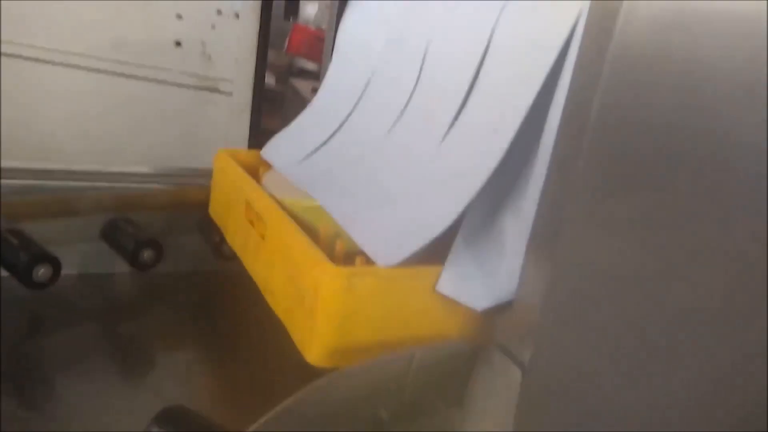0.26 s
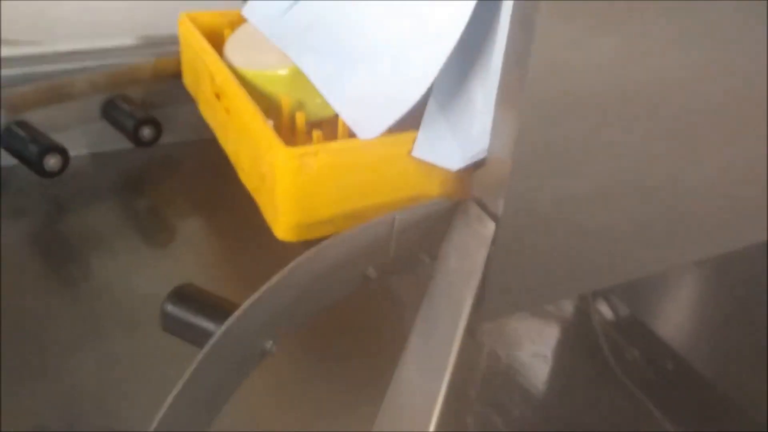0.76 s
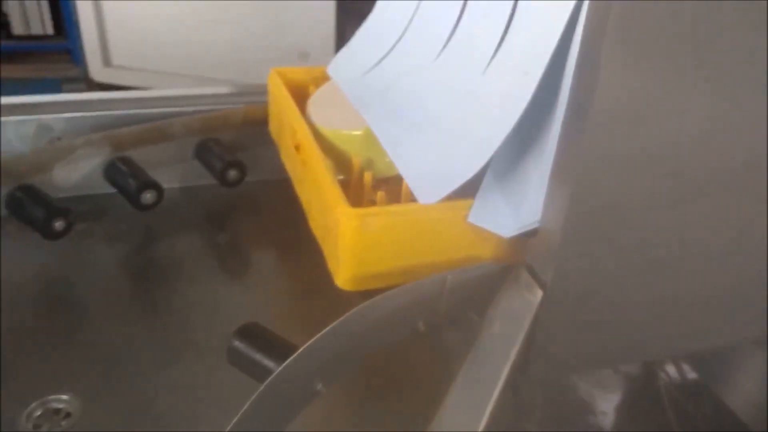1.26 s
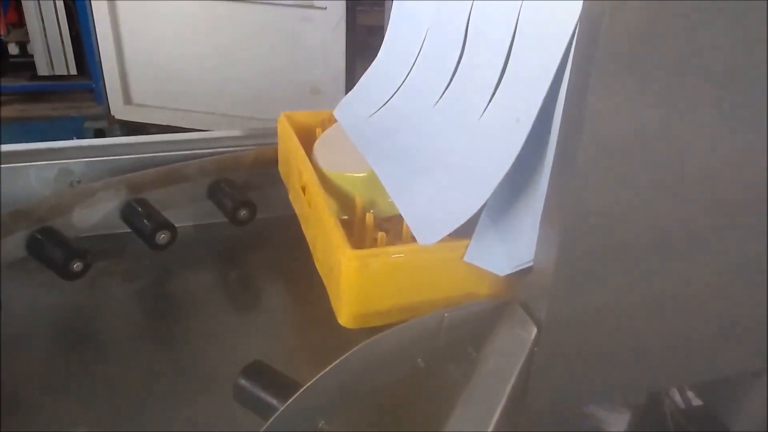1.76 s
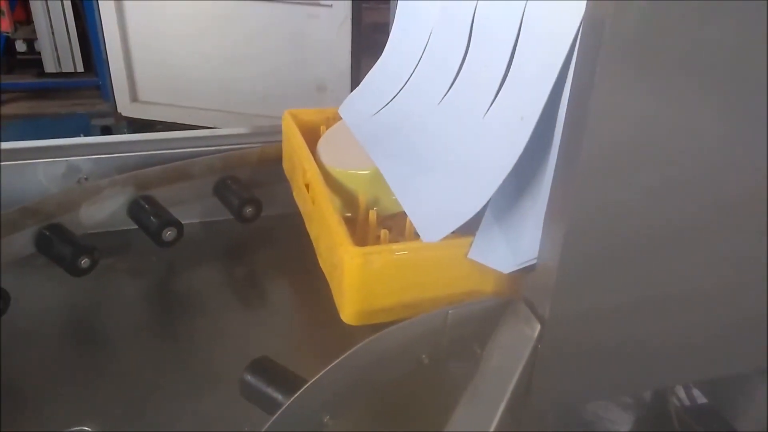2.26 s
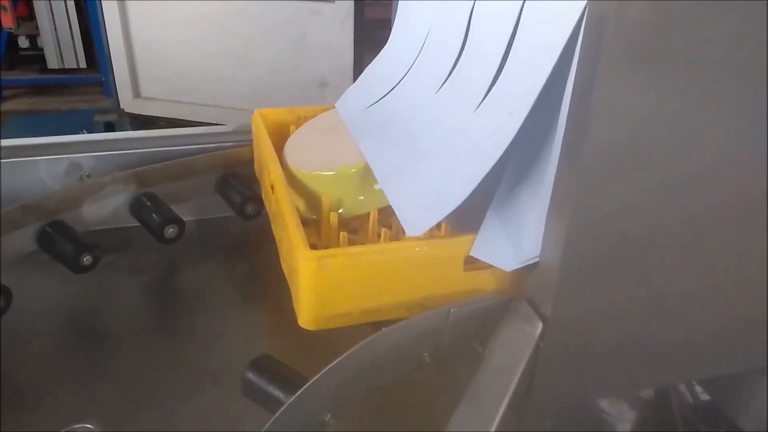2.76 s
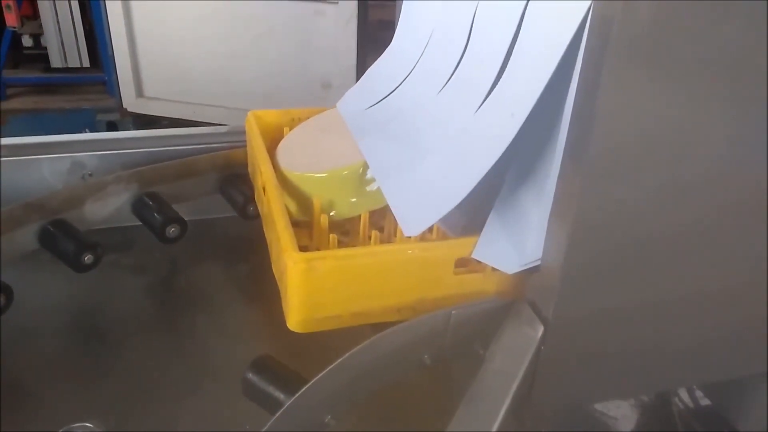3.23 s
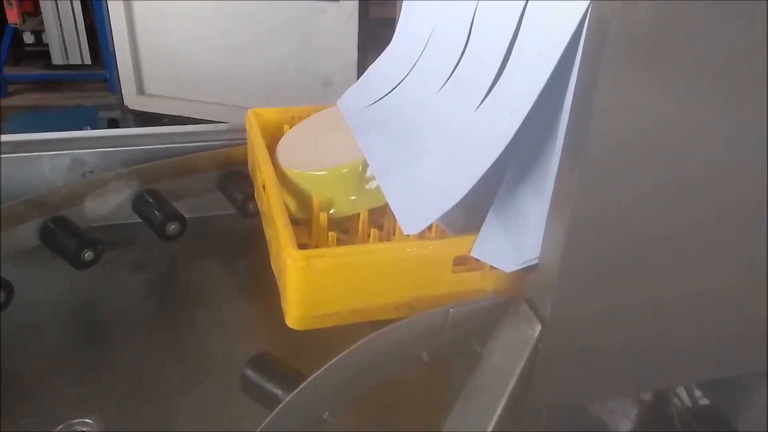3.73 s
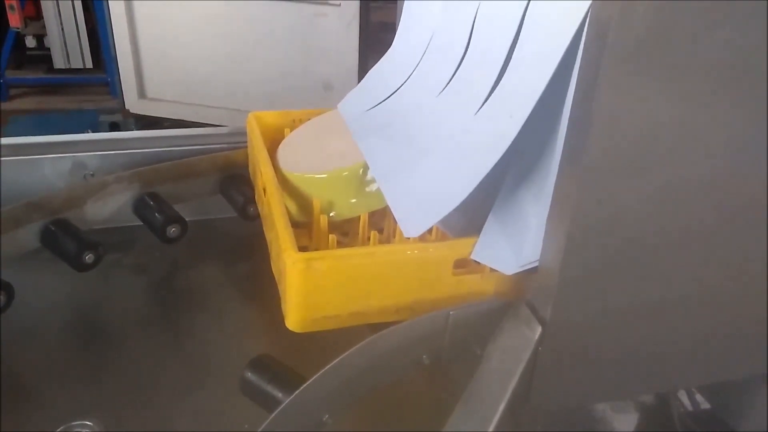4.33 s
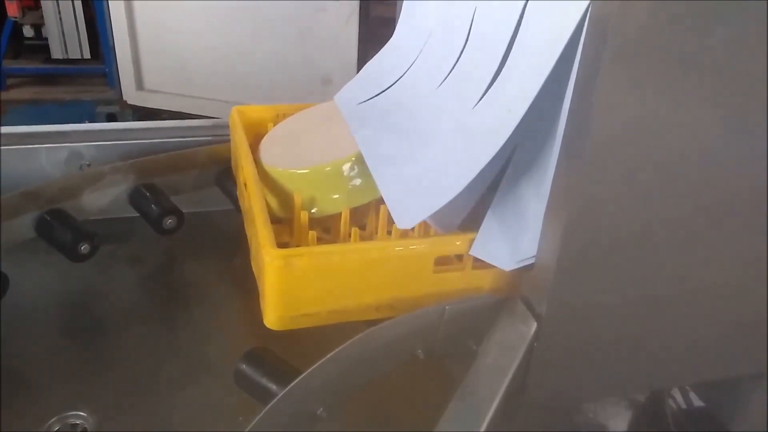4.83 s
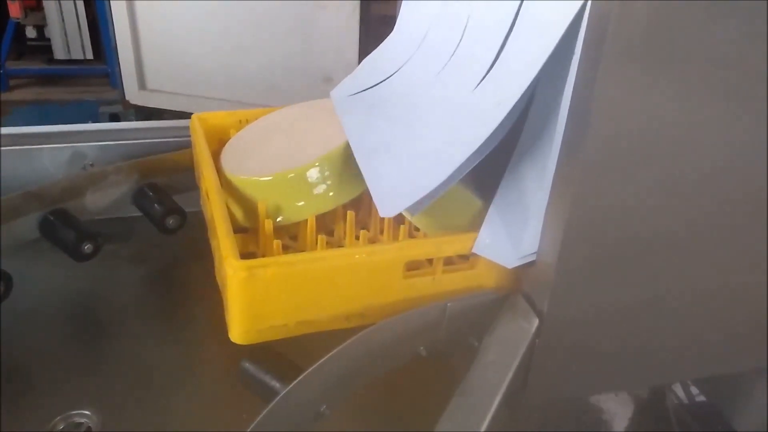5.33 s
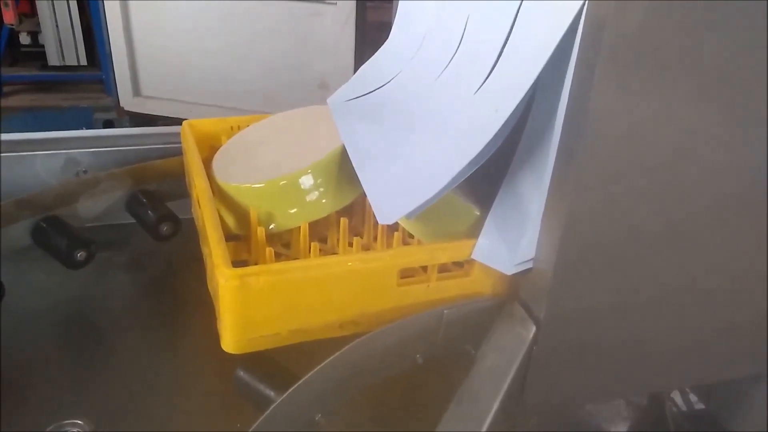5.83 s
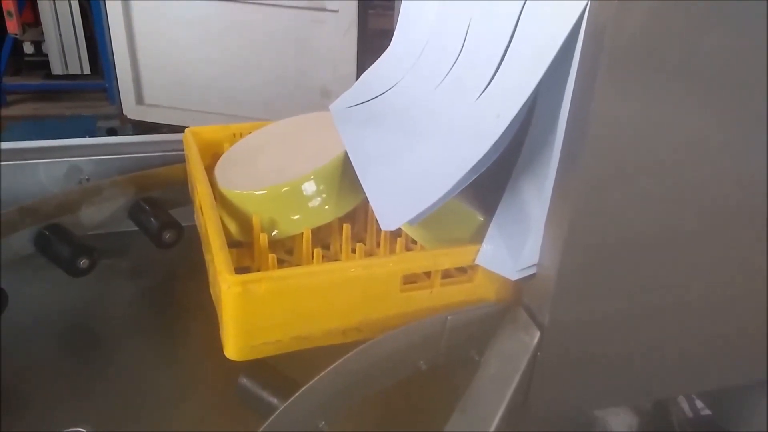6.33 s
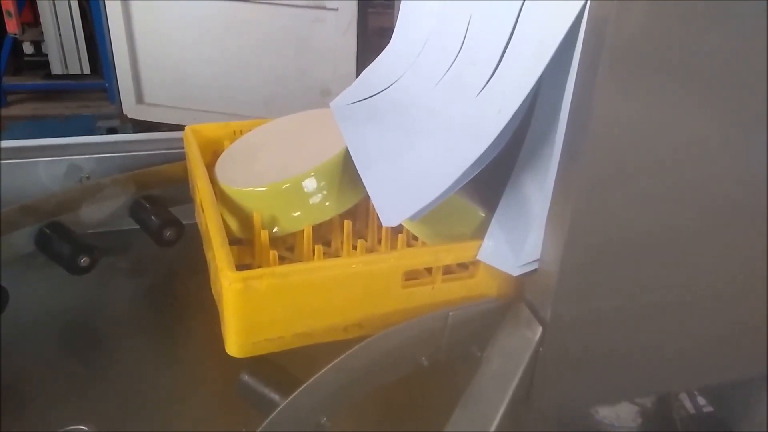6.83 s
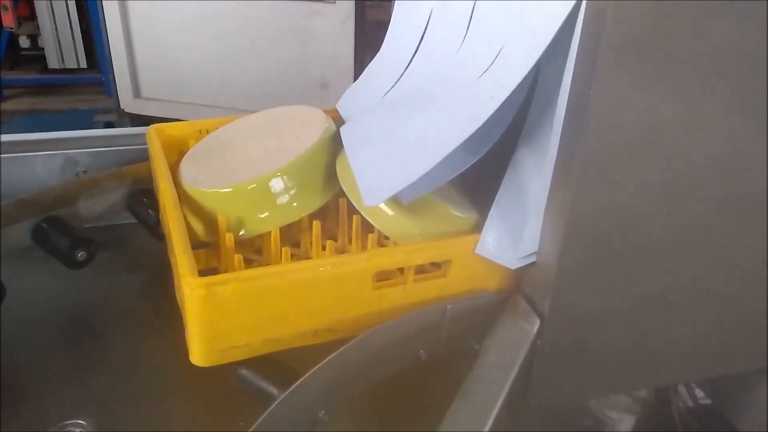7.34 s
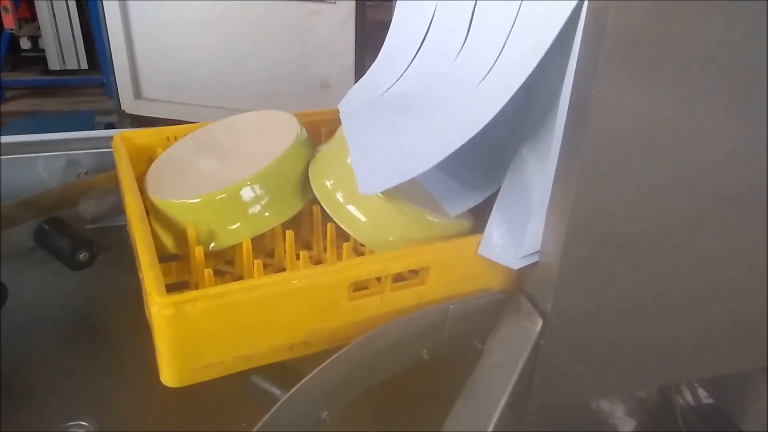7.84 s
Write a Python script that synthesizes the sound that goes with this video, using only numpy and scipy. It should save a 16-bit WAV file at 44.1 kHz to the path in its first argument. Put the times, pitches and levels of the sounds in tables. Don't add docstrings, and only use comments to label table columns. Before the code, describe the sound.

Sharp plastic slams, brief chattering ceramic clinks and small roller chirps over the muffled, pumping roar of a tunnel dishwasher in a canteen kitchen.

```python
import sys
import numpy as np
from scipy import signal
from scipy.fft import rfft, irfft, next_fast_len
from scipy.io import wavfile
from scipy.ndimage import uniform_filter1d, map_coordinates

SR = 44100
rng = np.random.default_rng(int(sys.argv[2]) if len(sys.argv) > 2 else 0)


def elevation(decibels):
    levels = np.asarray(decibels, float)
    return 10 ** (levels / 20)


def unload_wav(signal):
    wavfile.write(
        sys.argv[1],
        SR,
        np.round(np.clip(np.atleast_2d(signal).T, -1, 1) * 32767).astype(np.int16),
    )


N = 356857


def unit(x):
    return x / np.sqrt(np.mean(x ** 2) + 1e-20)


def along(points, hz):
    f, v = np.transpose(points)
    return np.interp(np.log(hz + 1), np.log(f + 1), v)


def wobble(rate):
    knots = rng.standard_normal(int(N * rate / SR) + 4)
    return map_coordinates(knots, [np.arange(N) * rate / SR])


def filtered(x, response):
    m = next_fast_len(x.shape[-1] + 8192)
    return irfft(rfft(x, m) * response(np.fft.rfftfreq(m, 1 / SR)), m)[..., :x.shape[-1]]


def add(track, s, sound, pan_db):
    place = track[:, round(max(s, 0) * SR):][:, :sound.shape[-1]]
    place += elevation(np.array([[pan_db / 2], [-pan_db / 2]])) * sound[..., :place.shape[1]]


def ring(hz, db, t60, attack, hold, rough, flutter_hz):
    t = np.arange(SR // 7) / SR
    hz, db, t60 = (np.atleast_1d(v)[:, None] for v in (hz, db, t60))
    knots = rng.standard_normal((2, 3, len(hz), 80))
    knots = knots[0] + 1j * knots[1]
    knots = 0.55 * knots[0] + 0.49 * knots[1:]
    place = np.clip(t * np.broadcast_to(flutter_hz, len(hz))[:, None], 0, 78)
    left = place.astype(int)
    part = np.sin(np.pi / 2 * (place % 1)) ** 2
    mode = np.arange(len(hz))[:, None]
    shake = knots[:, mode, left] * (1 - part) + knots[:, mode, left + 1] * part
    rough = np.clip(rough, 0, 1)
    fade_db = db - 60 * np.maximum(t - hold, 0) / t60
    fade_db = fade_db - 20 * (t / 0.14) ** 4
    waves = elevation(fade_db) * np.exp(2j * np.pi * (hz * t + rng.random(hz.shape)))
    rise = np.sin(np.pi / 2 * np.minimum(t / attack, 1)) ** 2
    return rise * ((np.sqrt(1 - rough) + np.sqrt(rough) * shake) * waves).real.sum(axis=1)


# (time [s], lift [dB], stays open [s])
SWELLS = [(.02, 6.5, 0.091), (0.384, 10.5, 0.028), (.55, 5.5, 0.018), (.695, 8.5, 0.025),
          (0.862, 12, 0.037), (1.08, 6, 0.0084), (1.18, 12.5, 0.062), (1.537, 8, 0.029), (1.905, 13, 0.1),
          (2.106, 9.5, 0.068), (2.388, 13, .02), (2.5, 3.5, 0.078), (2.62, -2, 0.043), (2.765, 6.5, 0.026),
          (2.95, 1, 0.028), (3.207, 12, 0.041), (3.419, 9.5, 0.034), (3.612, 14.5, 0.049),
          (3.8, 3.5, 0.092), (4.145, 6, .012), (4.235, 13, 0.15), (4.615, 9.5, 0.04), (4.779, 14.5, 0.025),
          (5.666, 7.5, 0.034), (5.998, 4.5, 0.015), (6.09, 2.5, 0.032), (6.31, 8.5, 0.062),
          (6.736, 10.5, 0.078), (7.3, 2, 0.045), (7.492, 12, 0.054)]
# (time [s], lift [dB])
OPENINGS = [(0.233, 7), (.335, 9.5), (.65, 11.5), (.807, 3.5), (1.32, 3), (1.36, 9.5), (1.456, 6),
            (2.174, 9), (2.69, 7.5), (3.858, 0.5), (4.065, 11.5), (4.49, 1), (5.23, 5.5), (5.36, 7.5),
            (5.431, 8.5), (5.529, 4), (5.81, -7), (6.23, -13), (6.675, 6.5), (6.946, 10), (7.24, -8),
            (7.709, 1.5), (7.45, 7), (3.74, -10), (7.91, 3), (8.01, 5)]
OPEN_S, CLOSE_S = 0.013, 0.044
DIP_S, DIP_SHARE = 0.03, 0.11


def suppressor_db():
    t = np.arange(N) / SR
    s, lift_db = np.transpose(OPENINGS)
    lifts = np.bincount(((s - .004) * SR).astype(int), lift_db, N)
    early = t[:2048]
    bump = np.minimum(early / 0.0041, 1) * np.exp(-(early / 0.018) ** 2)
    flick_db = signal.fftconvolve(lifts, bump)[:N]
    swell_db = np.zeros(N)
    for s, db, hold in SWELLS:
        opening = np.clip((t - s) / OPEN_S + .5, 0, 1)
        closing = np.exp(-np.maximum(t - s - hold, 0) / CLOSE_S)
        dip = DIP_SHARE * np.exp(-((t - s + DIP_S) / OPEN_S) ** 2)
        swell_db += db * (opening * closing - dip)
    return flick_db, swell_db


# (where opposite paths cancel [Hz], phase the left leads by above it [rad])
PORTS = [(560, 0), (1640, 3.14), (2800, .2), (4050, -2.7), (5150, -5.75), (6400, -8.5), (7550, -11.35),
         (8750, -14.5), (10000, -16.85), (11100, -19.05), (12600, -15.75), (13750, -18.85), (14850, -15.7),
         (15550, -15.7)]
# (frequency [Hz], likeness [0-1])
ALIKE = [(60, 1), (120, 0.89), (170, 0.64), (400, 0.47), (800, 0.86), (1100, 1), (2250, 0.96), (3450, 1),
         (5800, 0.58), (8000, 0.46), (10500, .2), (12100, 0.35), (13300, .75), (14300, .9), (15300, .6)]


def likeness(hz):
    spacing = np.interp(hz, np.transpose(PORTS)[0], np.arange(len(PORTS)))
    comb = np.abs(np.sin(np.pi * spacing)) ** 1.26
    return np.clip(along(ALIKE, hz), 0, 1) * np.where(hz > 1100, comb, 1)


def rush(spectrum, patchy_db):
    z = signal.stft(rng.standard_normal((2, N)), nperseg=512)[2]
    field = uniform_filter1d(rng.standard_normal(z.shape[1:]), size=6, axis=0)
    field = uniform_filter1d(field, size=6, axis=1)
    pair = signal.istft(z * elevation(patchy_db * unit(field)), nperseg=512)[1][:, :N]

    def mid_side(hz):
        turn = np.arccos(likeness(hz)) / 2
        return elevation(along(spectrum, hz)) * [np.cos(turn), np.sin(turn)]

    mid, side = filtered(pair, mid_side)
    return unit(np.array([mid + side, mid - side]))


# (time [s], level [dB])
ROAR = [(0, -48), (.5, -57), (1.4, -59), (2.6, -55.5), (3.75, -60.5), (4.0, -56), (4.7, -57.5),
        (5.2, -55.5), (8.09, -55.5)]
# (frequency [Hz], level per Hz [dB])
PUMPS = [(25, -18), (60, -8), (100, -2), (200, -5.5), (320, 0), (600, -4), (1000, -9), (1400, -12.5),
         (1900, -10), (2500, -19), (4000, -22.5), (8000, -73)]
SPRAY = [(800, -36.5), (2000, 10.5), (3000, 14), (4500, 12), (6000, 9), (8000, 4), (11000, -2), (14000, -5),
         (15300, -9), (16000, -68.5)]
HISS = [(1500, -32), (3000, -15), (8000, -7), (12000, -9), (15300, -9), (16000, -64)]


def washer():
    flick_db, swell_db = suppressor_db()
    base_db = np.interp(np.arange(N) / SR, *np.transpose(ROAR))
    gate_db = base_db + 2.0 * wobble(55) + flick_db + swell_db
    roar = elevation(gate_db - 0.45) * rush(PUMPS, patchy_db=1.74)
    spray_pan = elevation(np.array([[-1.1], [1.1]]))
    spray = elevation(0.84 * gate_db - 18.5) * spray_pan * rush(SPRAY, patchy_db=1.35)
    hiss = elevation(-79.0 + 0.35 * flick_db + .15 * swell_db) * rush(HISS, patchy_db=1.0)
    return roar + spray + hiss


def scrape(db, low_hz, high_hz, hold, t60):
    t = np.arange(SR // 7) / SR
    noise = rng.standard_normal(len(t)) + 0.52 * rng.standard_normal((2, len(t)))

    def band(f):
        return 1 / (1 + (low_hz / (f + 1)) ** 12) / (1 + (f / high_hz) ** 3) / (1 + (f / 10100) ** 40)

    fade_db = db - 60 * np.maximum(t - hold, 0) / t60 - 20 * (t / 0.11) ** 4
    return unit(filtered(noise, band)) * elevation(fade_db) * np.minimum(t / 0.0076, 1) ** 2


# (frequency [Hz], t60 [s])
GLAZE_T60 = [(3000, 1.85), (6000, 0.35), (12000, 0.97)]
JOLT_T60, JOLT_RISE_S = .1, 0.0038


def clink(low, high, high_db, jolts):
    hz, width, db = np.transpose([*low, *high])
    db = db + 10 * np.log10(width) + high_db * (np.arange(len(hz)) >= len(low))
    db = db - 10 * np.log10(np.sum(elevation(2 * db)))
    s, jolt_db = np.transpose(jolts)[..., None]
    age = np.maximum(np.arange(SR // 7) / SR - (s - s[0]), 0)
    pushes = elevation(jolt_db - 60 * age / JOLT_T60) * np.minimum(age / JOLT_RISE_S, 1)
    force = np.sqrt(np.sum(pushes ** 2, axis=0))
    t60 = along(GLAZE_T60, hz)
    flutter_hz = np.clip(2.09 * width, 10, 500)
    tone = ring(hz, db + 4.0, t60, 0.006, 0.0033, rough=0.88, flutter_hz=flutter_hz)
    rattle = ring(hz, db - 3, t60, 0.005, .003, rough=1, flutter_hz=480)
    return force * (tone + rattle + scrape(-11, 2600, 3900, 0.027, .9))


# [(frequency [Hz], width [Hz], level [dB])]
BOWL_1 = [
    [(2675, 16, 3.5), (3000, 140, -2), (3544, 71.5, -4.5), (3680, 45, 0.5), (3830, 53, 0.5),
     (4510, 25, -1.5), (5150, 70, -11), (5400, 73, -11), (5660, 63, -16), (6010, 52, -14),
     (6360, 82, -13.5), (6760, 32, -17), (6940, 16, -21), (7270, 160, -29)],
    [(8000, 70, -4), (8100, 72, 1), (8910, 71, 2), (9620, 70, -1.5), (9920, 33, -12), (11700, 40, -16),
     (13700, 19, -14), (13900, 80, -12)],
]
BOWL_2 = [
    [(2710, 29, -9), (3025, 104, -2), (3340, 24, -12), (3470, 59, -7), (3740, 30, 3), (4290, 17, -19),
     (4620, 31, -8), (5170, 20, 0), (5320, 37, -4), (5700, 81, -3), (6210, 26, -22), (6700, 24, -15),
     (6940, 38, -6), (7300, 54, -12)],
    [(8140, 38, -0.5), (8900, 35, -5), (9640, 37, -2), (11700, 49, -16), (13700, 38, -25)],
]
BOWL_3 = [
    [(2700, 20, -6), (2972, 67, 0), (3250, 63, -28), (3690, 86, -8.5), (3840, 110, -10), (4260, 49, -19),
     (4530, 49, -17), (4900, 110, -29), (5150, 29, -24), (5790, 56, -17.5), (6290, 240, -29),
     (6800, 69, -18), (7230, 40, -24)],
    [(7760, 62, -15), (8100, 110, -2), (8360, 130, -2.5), (8950, 130, -1), (9630, 52, -1.5),
     (10200, 39, -12), (11700, 41, -21), (12400, 60, -15), (13900, 200, -16)],
]
BOWL_4 = [
    [(2684, 27, -6), (2968, 47.4, -1), (3600, 30, -5), (3830, 60, -4), (4460, 88, -18), (5170, 71, -30),
     (5760, 35, -31), (6000, 64, -18.5), (6830, 48, -32), (7140, 48, -25)],
    [(7970, 79, -6), (8360, 59, -6), (8960, 51, 2), (9670, 29, 5.5), (13200, 31, -20), (13800, 84, -18),
     (14400, 42, -26)],
]
# (level of high modes [dB], jolts [(time [s], level [dB])])
CLINKS = [
    (-14, [(1.911, -21.5), (1.916, -18), (1.929, -16.5), (1.938, -17), (1.948, -15.5), (1.958, -20), (1.973, -20), (1.99, -23.5), (2.003, -23)]),
    (-9.5, [(4.237, -24.5), (4.246, -26), (4.256, -28), (4.27, -26.5), (4.283, -29.5), (4.297, -33)]),
    (-18, [(4.304, -18.5), (4.312, -19), (4.319, -19.5), (4.333, -26), (4.344, -22.5), (4.358, -23.5), (4.367, -29), (4.384, -27.5), (4.399, -30)]),
    (-16, [(6.741, -23), (6.752, -21.5), (6.764, -24), (6.773, -27), (6.79, -25.5), (6.8, -30), (6.828, -33)]),
]
# (time [s], peak [dB], chatter [s], modes [(frequency [Hz], level [dB],
# t60 [s])])
CROCKERY = [
    (.856, -30, .004, [(2490, -3, .05), (3900, 4, 0.045)]),
    (0.0062, -30.5, 0.022, [(1860, -2, 0.088), (2730, -4.5, .12), (3090, -4, 0.12), (4094, -0.5, 0.34), (6270, -11, 0.16), (8420, -9, 0.058), (9000, -20, 0.067)]),
    (2.3907, -26, 0.017, [(2850, -4.5, 0.11), (3040, -3.5, 0.087), (4140, -1.5, 0.064), (5523, -21, 0.065), (7230, -14, 0.042), (9730, -19.5, 0.13)]),
    (.886, -30, 0.0073, [(2430, 3.5, 0.071), (2640, 4, 0.063), (3850, 5.5, 0.053), (4740, 1, 0.028), (4970, -19, .091)]),
            (6.314, -25, 0.036, [(2840, -9.5, 0.13), (2964, -2, 0.28), (3727, -4, 0.16), (4070, -19, .12), (4350, -11, .12), (4560, -14, .12), (5160, -10.5, 0.11), (5400, -23, 0.089), (6840, -27, .12), (8100, -21.5, .1), (8393, -20, .08), (8900, -14, 0.21), (11100, -28, .13), (13900, -31, .12)]),
    (1.182, -32.5, 0.04, [(1698, -1, 0.16), (2450, 1, 0.08), (2700, 1, 0.073), (2930, 0, 0.12), (3580, -5.5, .1)]),
    (4.783, -27, 0.024, [(2787, -3.5, 0.097), (3020, 0.5, 0.13), (4130, -12, 0.055), (5170, -7, 0.094), (5740, -15, 0.092), (6106, -17, 0.058), (6800, -14.5, 0.088), (8450, -20, 0.087), (9100, -26, 0.073)]),
]


def bowls():
    track = np.zeros((2, N))
    for modes, (high_db, jolts) in zip([BOWL_1, BOWL_2, BOWL_3, BOWL_4], CLINKS):
        add(track, jolts[0][0] - .004, clink(*modes, high_db, jolts), pan_db=-5.0)
    for s, db, chatter, modes in CROCKERY:
        modes = np.transpose(modes)
        tone = elevation(db - 4.0) * ring(*modes, 0.0094, chatter, rough=0.99, flutter_hz=143.6)
        rattle = elevation(db - 12) * ring(*modes, 0.006, chatter, rough=1, flutter_hz=470)
        rub = scrape(db - 20.0, 2460, 3900, chatter, 0.11)
        add(track, s - .003, tone + rattle + rub, pan_db=-4.5)
    return track


def single_rings(rows, t60, attack, rough, flutter_hz, pan_db):
    track = np.zeros((2, N))
    for s, db, hz in rows:
        add(track, s - attack / 2, ring(hz, db, t60, attack, 0.0075, rough, flutter_hz), pan_db)
    return track


# (time [s], peak [dB], frequency [Hz])
PINGS = [(.015, -30, 926), (.19, -45, 4900), (2.69, -59.5, 8670), (3.858, -54.5, 8400),
         (4.066, -44.5, 1130), (1.538, -45, 2900), (1.558, -50.5, 2910), (.858, -46, 4700),
         (8.005, -46, 584), (.4, -43, 3310), (.4, -42, 4700), (4.557, -49.5, 3350), (5.676, -41, 3200),
         (6.1, -41.5, 295), (2.172, -37, 113), (7.277, -51, 5340), (7.33, -50, 3200), (7.442, -52, 6940),
         (7.45, -56, 8900), (7.53, -44.5, 5150), (7.56, -43, 923), (7.913, -46.5, 3230), (.018, -33, 608)]


def far_crockery():
    return single_rings(PINGS, 0.11, .011, rough=.9, flutter_hz=190, pan_db=-1.5)


def blow(db, tail_db, crack_band, echo_band, hz, modes_db):
    t = np.arange(SR // 7) / SR
    noise = rng.standard_normal(len(t)) + 0.6 * rng.standard_normal((2, len(t)))
    rise = np.minimum(t / 0.0044, 1) ** 5
    crack = filtered(noise * rise * elevation(-60 * t / 0.025), crack_band)
    echo_fade = elevation(-60 * t / 0.19 - 20 * (t / 0.12) ** 5)
    echoes = unit(filtered(noise[:, ::-1], echo_band)) * rise * echo_fade
    modes_db = modes_db - modes_db.max()
    modes = elevation(-1.5) * ring(hz, modes_db, 0.066, 0.0074, 0.0056, rough=0.82, flutter_hz=189)
    return elevation(db) * (crack / np.abs(crack).max() + elevation(tail_db) * (echoes + modes))


# (contacts [(time [s], peak [dB], tail below crack [dB])], resonances [(frequency [Hz], width [Hz], level [dB])])
SLAMS = [
    ([(.057, -12.5, -14), (.0608, -14.5, -22), (.071, -24, -18), (.078, -24, -16), (.103, -29.5, -10)], [(1825, 66, -4.5), (2450, 28, -3), (2890, 25, -2.5), (3080, 120, -5), (3410, 27, -3), (3740, 220, -3.5), (4130, 84, 0), (4850, 21, -1), (5030, 54, -3), (5200, 100, -5), (5470, 32, -5.5), (6230, 56, -17.5)]),
    ([(1.1855, -16, -17)], [(1687, 53, -2.5), (2440, 45, -5), (2700, 27, 0), (3000, 120, 1), (3540, 50, -3.5), (4100, 37, -25)]),
    ([(3.2112, -10.5, -19), (3.2148, -17, -21.5)], [(2450, 41, -4), (2710, 27, -3), (2920, 48, -2), (3170, 65, -5), (3600, 110, -6.5), (3750, 56, -11), (4045, 39, -1.5), (4680, 31, -7), (5100, 34, -7), (5650, 49, -17.5), (6270, 110, -19), (6930, 65, -18.5), (7400, 84, -21)]),
    ([(3.6215, -13, -17.5), (3.641, -21, -18)], [(1620, 21, -14.5), (1870, 66, -5.5), (2510, 95, -7), (2700, 34, -3), (3020, 120, -1.5), (3390, 86, -4), (3730, 26, -15), (4040, 18, -5.5), (4310, 23, -12)]),
]
# (time [s], peak [dB], lowest [Hz], highest [Hz], tail below crack [dB])
CLACKS = [(2.69, -51, 6000, 15500, -21), (6.446, -45, 5000, 13000, -18), (5.677, -37.5, 7300, 9400, -20),
          (0.3898, -23.5, 4560, 5330, -23), (0.89, -25.5, 2200, 5250, -22), (.392, -37, 3200, 6200, -12),
          (0.78, -36, 2300, 6000, -20), (4.07, -48, 500, 4000, -12), (1.32, -51, 400, 2000, -16),
          (4, -49, 2000, 2800, -10), (3.461, -49, 2750, 3200, -13), (.389, -39.5, 420, 3500, -21),
          (.698, -40, 300, 1500, -21), (.808, -43, 440, 1600, -23), (1.5, -50, 400, 1800, -19),
          (8.3, -41, 170, 1400, -17), (7.708, -47.5, 820, 1060, -21)]
# (frequency [Hz], level [dB])
RACK = [(1870, -1), (2440, -14), (2690, -2), (2945, -2), (3246, -13), (3526, -8), (3740, -10), (4060, -0.5),
        (4893, -10), (5200, -3), (5750, -19)]
PAWL_HZ, PAWL_PAN_DB, RACK_PAN_DB = 5000, -7, 0
CRACK_WIDER_HZ, ECHO_WIDER_HZ = 400, 170


def rack():
    track = np.zeros((2, N))
    hz, level_db = np.transpose(RACK)
    for s, db, low_hz, high_hz, tail_db in CLACKS:
        band = lambda f: 1 / (1 + (low_hz / (f + 1)) ** 16) / (1 + (f / high_hz) ** 36)
        modes_db = level_db + 20 * np.log10(band(hz) + 1e-9) + rng.normal(0, 2.5, len(hz))
        pan_db = PAWL_PAN_DB if low_hz > PAWL_HZ else RACK_PAN_DB
        add(track, s - .005, blow(db, tail_db, band, band, hz, modes_db), pan_db)
    for contacts, peaks in SLAMS:
        centre, width, top_db = np.transpose(peaks)[..., None]

        def body(f, wider_hz):
            humps = elevation(2 * top_db) / (1 + (2 * (f - centre) / (wider_hz + width)) ** 4)
            return np.sqrt(np.sum(humps, axis=0))

        crack_band = lambda f: body(f, CRACK_WIDER_HZ)
        echo_band = lambda f: body(f, ECHO_WIDER_HZ)
        for s, db, tail_db in contacts:
            slam = blow(db, tail_db, crack_band, echo_band, centre[:, 0], top_db[:, 0])
            add(track, s - .005, slam, RACK_PAN_DB)
    return track


# (time [s], peak [dB], frequency [Hz])
CHIRPS = [(0.267, -46, 1840), (1.6272, -46, 1630), (2.14, -49, 1750), (3.307, -50, 1770),
          (4.0197, -51.5, 1550), (5.041, -47, 1790), (5.0664, -49, 1790), (5.1462, -52, 1810),
          (5.221, -42.5, 1717), (5.3913, -43.5, 1950), (5.4281, -42, 1880), (5.668, -33.5, 1755),
          (5.7096, -39.5, 1780), (5.7526, -44.5, 1770), (5.8255, -48, 1760), (5.9284, -56, 1630),
          (5.9878, -48, 1830), (6.1644, -45.5, 1820), (6.3826, -43, 1730), (6.6751, -47.5, 1800),
          (6.9461, -46.5, 1865), (7.2779, -51, 1730), (7.3402, -46, 1774), (7.5397, -36, 1750),
          (7.6136, -40, 1740), (7.9887, -42.5, 1660)]
SQUEAKS = [(4.9621, -57, 1740), (5.1048, -59, 1740), (6.1005, -54, 1990), (6.1454, -57, 1810),
           (6.319, -44, 1780), (6.3647, -48, 1710), (6.5066, -51, 1880), (6.5785, -49, 1780),
           (6.8386, -46, 1770), (7.2579, -53.5, 1750), (7.3254, -53, 1780), (7.3701, -55, 1790),
           (7.4515, -56, 1770), (7.499, -52, 1780), (7.9164, -57, 1690)]


def rollers():
    chance = rng.random((64, 3))
    patter_s = N / SR * chance[:, 0] ** .6
    patter = np.c_[patter_s, -60 + 9 * chance[:, 1], 1650 + 300 * chance[:, 2]]
    rows = np.r_[CHIRPS, SQUEAKS, patter]
    return single_rings(rows, 0.11, 0.00817, rough=0.95, flutter_hz=170, pan_db=2.0)


# (time [s], peak [dB], frequency [Hz])
THUDS = [(0.406, -41.5, 123.4), (0.691, -42, 100), (0.872, -47, 122), (1.901, -52, 108), (2.11, -40, 110),
         (2.13, -30, 100), (2.13, -43, 336), (2.178, -43, 297), (2.385, -44.5, 136), (2.499, -45, 85),
         (2.774, -37.5, 120.8), (4.149, -50, 99), (4.626, -39, 99), (5.355, -50, 134), (5.738, -53, 132.5),
         (6.001, -41.5, 105), (6.537, -41, 110), (7.508, -33.5, 103.7), (7.531, -33, 112)]


def table():
    return single_rings(THUDS, .13, 0.0195, rough=0.53, flutter_hz=60, pan_db=-1.0)


# (frequency [Hz], t60 [s])
KITCHEN = [(200, .3), (2000, 0.22), (6000, 0.19), (12000, 0.22)]


def kitchen(x):
    hz, t, z = signal.stft(rng.standard_normal((2, SR // 2)), SR, nperseg=256)
    fade = elevation(-60 * t / along(KITCHEN, hz)[:, None])
    tail = signal.istft(z * fade, SR, nperseg=256)[1]
    tail[1] = 0.5 * tail[0] + 0.81 * tail[1]
    return signal.fftconvolve(x, tail / np.linalg.norm(tail[0]), axes=1)[:, :N]


def treble_sunk(background, loud):
    power = np.abs(uniform_filter1d((loud ** 2).mean(axis=0), size=1024))
    over_db = np.maximum(10 * np.log10(power + 1e-12) + 37.0, 0)
    treble = filtered(background, lambda hz: hz > 10200)
    return background - treble * (1 - elevation(-1.3 * over_db))


# (frequency [Hz], width [Hz], share lost [0-1])
HIT_DIPS = [(2233, 120, .85), (7660, 160, .85)]


def near_hit_dips(hz):
    return 1 - sum(np.clip(lost, 0, 1) * np.exp(-((hz - c) / w) ** 4) for c, w, lost in HIT_DIPS)


def scene():
    clinks = bowls()
    hits = clinks + rack()
    hits = hits + elevation(-15.0) * kitchen(hits)
    hits = filtered(hits, near_hit_dips)
    unlike = filtered(hits[0] - hits[1], lambda hz: likeness(hz) ** 14) / 2
    hits = hits + unlike * [[-1], [1]]
    return hits + rollers() + far_crockery() + table() + treble_sunk(washer(), clinks)


def roll_off(x):
    return signal.sosfilt(signal.butter(12, 15600, fs=SR, output="sos"), x)


BASS_HZ, BASS_RAD, BASS_PAN_DB = 130, 1.9, -1.5
MIC_LOW_HZ = 70.5


def record(dry):
    cancel_hz, rad = np.transpose(PORTS)
    dry = filtered(dry, lambda hz: .2 + 0.79 / (1 + (MIC_LOW_HZ / (hz + 1)) ** 6))

    def ports(hz):
        bass = 1 / (1 + (hz / BASS_HZ) ** 4)
        steps = rad[np.maximum(np.searchsorted(cancel_hz, hz) - 1, 0)]
        turn = uniform_filter1d(steps, size=2500) + BASS_RAD * bass
        turn = turn - 1j * np.log(elevation(BASS_PAN_DB)) * bass
        return np.exp(.5j * turn * np.array([[1], [-1]]))

    return roll_off(filtered(dry, ports))


dry = scene()
out = record(dry)
unload_wav(out)
```